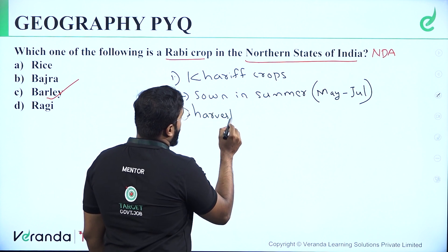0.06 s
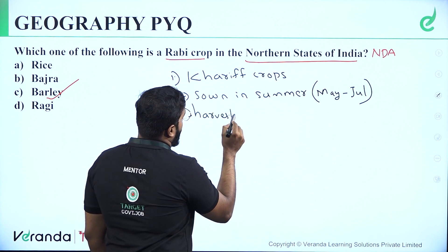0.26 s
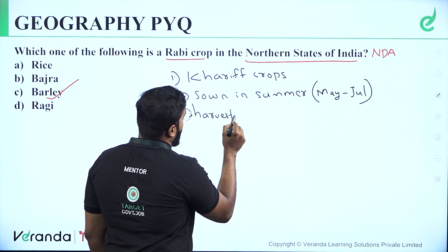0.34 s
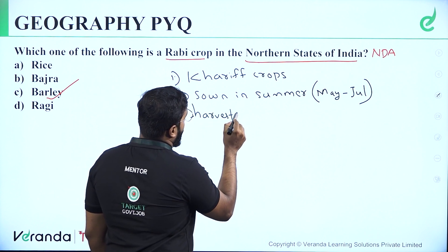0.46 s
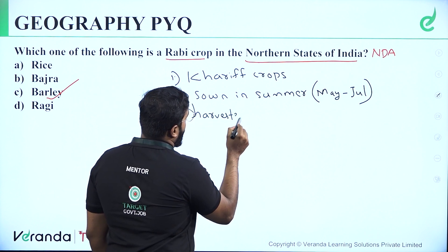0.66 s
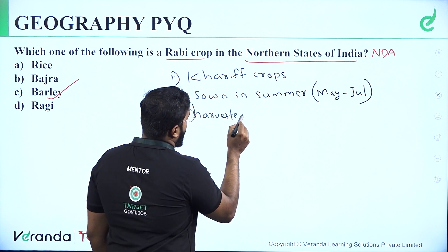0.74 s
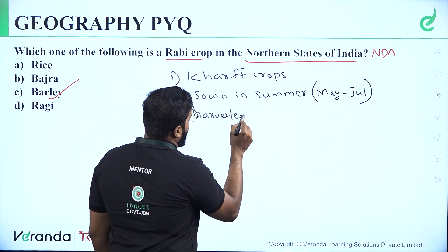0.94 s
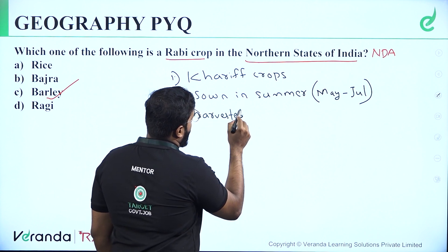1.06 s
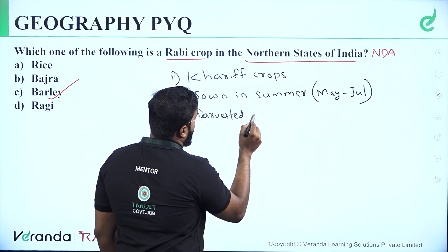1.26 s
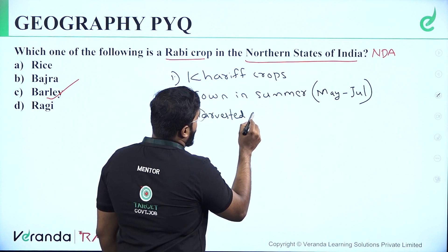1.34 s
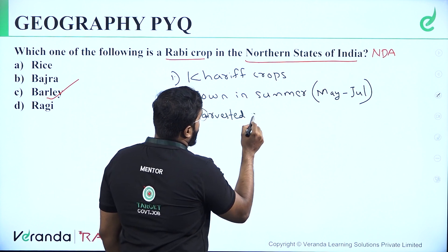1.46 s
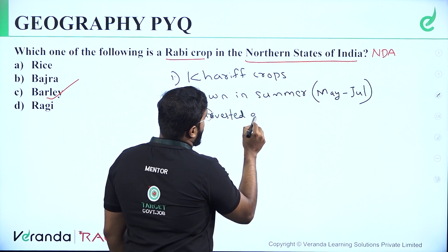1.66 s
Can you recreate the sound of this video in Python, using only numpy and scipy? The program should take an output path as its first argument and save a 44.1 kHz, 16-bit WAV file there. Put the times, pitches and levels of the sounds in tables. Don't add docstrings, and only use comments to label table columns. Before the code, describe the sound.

A hard pen tip taps a glass-fronted board. The tail of an earlier tap fades at the start, then dull knocks with bright clicks and short hollow rings fall at 0.23, 0.43 (strongest), 0.79 (softest) and 1.38 seconds (brighter). Faint grainy sliding hisses fill the gaps, fuller from 0.55 and running to the end at 1.75. Room tail, soft air rush and a barely audible high whine lie underneath.

```python
import sys
import numpy as np
from scipy import signal
from scipy.fft import rfft, irfft, next_fast_len
from scipy.io import wavfile
from scipy.ndimage import map_coordinates

SR = 44100
rng = np.random.default_rng(int(sys.argv[2]) if len(sys.argv) > 2 else 0)


def level_to_linear(level):
    exponent = np.asarray(level, float) / 20
    return 10 ** exponent


def wav_record(signal):
    frames = np.transpose(np.atleast_2d(signal))
    bounded = np.clip(frames, -1, 1)
    quanta = np.round(bounded * 32767).astype(np.int16)
    wavfile.write(sys.argv[1], SR, quanta)


N = 74970
LEAD = SR // 4

# [f/Hz, level/dB per Hz]
AIR_SPECTRUM = [(30, -17.5), (160, 0.5), (500, -8.5), (1000, -12.5), (2500, -29.5), (6000, -35),
                (12000, -37), (16000, -35)]
# [f/Hz, width/Hz, level/dB]
AIR_HUMS = [(93.2, 11.6, -68.5), (178, 41, -67), (555.6, 96, -64)]
# [f/Hz, level/dB rms]
WHINE_TONES = [(13741, -74)]
# [start t/s, end t/s, level/dB]
STROKES = [
    (-.05, .085, -66.5),
    (.24, .32, -75),
    (.44, .56, -70),
    (0.54, 0.704, -65),
    (.805, 0.976, -65.5),
    (0.953, 1.124, -64),
    (1.11, 1.258, -63),
    (1.395, 1.539, -63),
    (1.515, 1.656, -65.5),
    (1.648, 1.75, -63),
]
# [f/Hz, level/dB]
SLIDE_SPECTRUM = [(700, 13), (2000, -5), (4500, 0), (8200, -4), (9300, 7), (10500, 0), (12200, 2.5),
                  (15500, -19)]
# [f/Hz, t/s]
ROOM_DECAY = [(100, 1), (260, 0.48), (700, 0.69), (1840, 0.79), (4850, 0.72), (10000, 0.67)]
# [f/Hz, width/Hz, level/dB]
RADIATED = [(247.5, 27, 11.5), (357, 110, 5), (456, 68, 7), (716.5, 160, 7.5), (1013, 273, 2),
            (1374, 480, -4), (2040, 1830, -12), (4400, 1750, -15), (9900, 9800, -23)]
# [f/Hz, level/dB]
ROOM_TOP = [(5300, -0.5), (6200, -1), (16000, -12)]
# [t/s, knock level/dB, flutter delay/ms, ring level over knock/dB, low housing ring f/Hz]
TAPS = [
    (-.12, -12.5, 2.9, -5, 682.4),
    (.2271, -12.5, 2.9, -9, 699),
    (0.4251, -12, 2.7, -10, 779),
    (0.7917, -14, 2.85, -9.5, 729),
    (1.3792, -13, 3.15, -6, 920),
]
FLUTTER_PASSES = [-2.5, -9.5, -14.5, -21]
# [f/Hz, level/dB, 60 dB fall t/s]
PANE_MODES = [(2193, -2.5, 0.027), (3230, -25.5, 0.044), (3690, -16, 0.024), (4020, -3.5, 0.022),
              (4320, -6.5, 0.029), (4560, -4, 0.033), (4820, -1, 0.029), (5154, -6.5, 0.028)]
# [f/Hz, level/dB, 60 dB fall t/s]
HOUSING_MODES = [(250, -29, .3), (468, -30, .15)]
# [f/Hz, level/dB]
TICK_SPECTRUM = [(1800, 1), (2600, -3.5), (6500, 4.5), (8300, -6), (9500, 0), (11200, -1), (14000, -12),
                 (16000, -21)]
# [f/Hz, left minus right level/dB]
SIDES = [(60, -1.5), (1000, -1.45), (12000, -1.45)]


def unit(x):
    return x / np.sqrt(np.mean(x ** 2) + 1e-20)


def along(points, hz):
    f, v = np.transpose(points)
    return np.interp(np.log(hz + 1), np.log(f + 1), v)


def filtered(x, response):
    m = next_fast_len(x.shape[-1] + 8192)
    spectrum = rfft(x, m) * response(np.fft.rfftfreq(m, 1 / SR))
    return irfft(spectrum, m)[..., :x.shape[-1]]


def peak(f, hz, width_hz):
    return 1j * f * width_hz / (hz * hz - f * f + 1j * f * width_hz)


def delayed(f, seconds):
    return np.exp(-2j * np.pi * f * seconds)


def swell(t, seconds):
    return 1 - np.exp(-(t / seconds) ** 2)


def coloured(spectrum, size):
    below = (spectrum[0][0] / 2, -90)
    above = (spectrum[-1][0] * 1.1, -90)
    closed = [below] + list(spectrum) + [above]
    return unit(filtered(rng.standard_normal(size), lambda f: level_to_linear(along(closed, f))))


def wobble(rate):
    points = rng.standard_normal(int(N * rate / SR) + 4)
    return map_coordinates(points, [np.arange(N) * rate / SR])


def air():
    out = level_to_linear(-54.5 + 0.8 * wobble(4.7)) * coloured(AIR_SPECTRUM, N)
    for hz, width_hz, db in AIR_HUMS:
        hum = filtered(rng.standard_normal(N), lambda f: peak(f, hz, width_hz) ** 2)
        out += level_to_linear(db) * unit(hum)
    return out


def whine():
    t = np.arange(N) / SR
    return sum(level_to_linear(db) * np.sqrt(2) * np.sin(2 * np.pi * hz * t) for hz, db in WHINE_TONES)


def slide():
    t = np.arange(N) / SR
    edge = lambda u: np.clip(u / 0.033, 0, 1)
    speed = sum(level_to_linear(db) * edge(t - start) * edge(end - t) for start, end, db in STROKES)
    grain = level_to_linear(0.72 * wobble(26.5) + 0.8 * wobble(270))
    return speed * grain * coloured(SLIDE_SPECTRUM, N)


def room(ring_db):
    t = np.arange(SR) / SR
    hz, frame_t, z = signal.stft(rng.standard_normal(SR), SR, nperseg=256)
    fading = z * level_to_linear(-60 * frame_t / along(ROOM_DECAY, hz)[:, None])
    late = signal.istft(fading, SR, nperseg=256)[1][:SR]
    early = rng.standard_normal(SR) * level_to_linear(-60 * t / 0.098)
    uneven = level_to_linear(1 * wobble(300)[:SR])
    tail = (level_to_linear(-12.5) * late + level_to_linear(-0.5) * early) * uneven

    def colour(f):
        return np.sqrt(sum(abs(level_to_linear(db) * peak(f, hz, width_hz) ** 2) ** 2 for hz, width_hz, db in RADIATED))

    def bright(f):
        tilt = [(2500, 0.0047), (4000, 0.77 * (ring_db + 5))]
        return level_to_linear(along(tilt, f) + along(ROOM_TOP, f))

    split_hz = 560
    bands = lambda f: np.array([f < split_hz, f >= split_hz])
    low, high = filtered(tail, lambda f: colour(f) * bright(f) * bands(f))
    return low * swell(t, 0.013) + high * swell(t, 0.0024)


def thud(t):
    push = filtered(1. * (t == 0), lambda f: peak(f, 40, 65))
    return level_to_linear(-31) * push / abs(push).max()


def rings(modes, t, swell_s, step_s, blur):
    hz, db, t60 = np.transpose(modes)[:, :, None]
    luck = rng.standard_normal((len(modes), 2))
    level = level_to_linear(db + 1 * luck[:, :1] - 60 * t / t60)
    waves = level * np.cos(2 * np.pi * (hz * (t - step_s) + blur * luck[:, 1:]))
    return waves.sum(0) * swell(t, swell_s)


def housing_ring(t):
    linger_hz, split_hz = 698, 26.33
    pair = [(linger_hz + side * split_hz, -32.5, 0.64) for side in (0, 1)]
    return rings(HOUSING_MODES + pair, t, swell_s=0.013, step_s=0, blur=4.5)


def pane_ring(t, ring_db):
    return level_to_linear(ring_db) * rings(PANE_MODES, t, swell_s=0.0022, step_s=0.003, blur=0.12)


def tick(t, ring_db):
    click = level_to_linear(-60 * t / 0.0083)
    fizz = level_to_linear(-3 - 60 * t / 0.042)
    fade = (click + fizz) * swell(t, 0.0008)
    return level_to_linear(-18.5 + ring_db + 10.5) * fade * coloured(TICK_SPECTRUM, len(t))


def knock(t, delay_ms, box_hz):
    def flutter(f):
        return 1 + sum(level_to_linear(db) * delayed(f, (k + 1) * delay_ms / 1000) for k, db in enumerate(FLUTTER_PASSES))

    def box(f):
        return level_to_linear(6) * peak(f, box_hz, 51) * delayed(f, 0.00012)

    def response(f):
        return -peak(f, 970, 1970) ** 4 * (flutter(f) + box(f)) * delayed(f, 0.00035)

    out = filtered(1. * (t == 0), response)
    return out / abs(out).max()


def tap(delay_ms, ring_db, box_hz):
    t = np.arange(SR // 2) / SR
    body = knock(t, delay_ms, box_hz) + thud(t) + housing_ring(t)
    return body + tick(t, ring_db) + pane_ring(t, ring_db)


def taps():
    out = np.zeros(LEAD + N + 2 * SR)
    for s, db, delay_ms, ring_db, box_hz in TAPS:
        at = LEAD + round(s * SR)
        direct = tap(delay_ms, ring_db, box_hz)
        out[at:at + len(direct)] += level_to_linear(db) * direct
        out[at:at + SR] += level_to_linear(db) * room(ring_db)
    return out[LEAD:LEAD + N]


def scene():
    mono = air() + whine() + slide() + taps()
    return np.array([mono, mono])


def top_cut(x):
    return signal.sosfilt(signal.butter(12, 16510, fs=SR, output="sos"), x)


def record(dry):
    def response(f):
        balance = along(SIDES, f) * np.array([[0.5], [-0.5]])
        return level_to_linear(balance - 32 * (f > 15850))

    return top_cut(filtered(dry, response))


dry = scene()
out = record(dry)
wav_record(out)
```